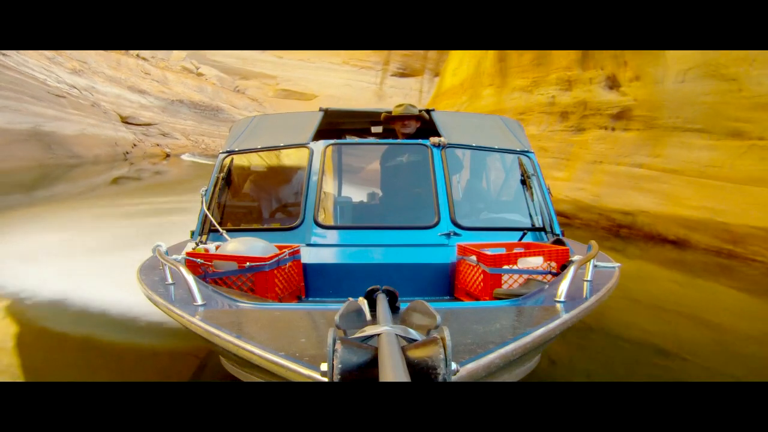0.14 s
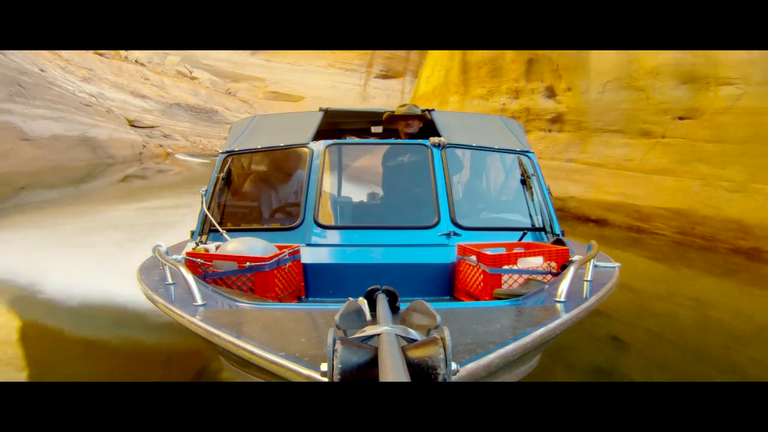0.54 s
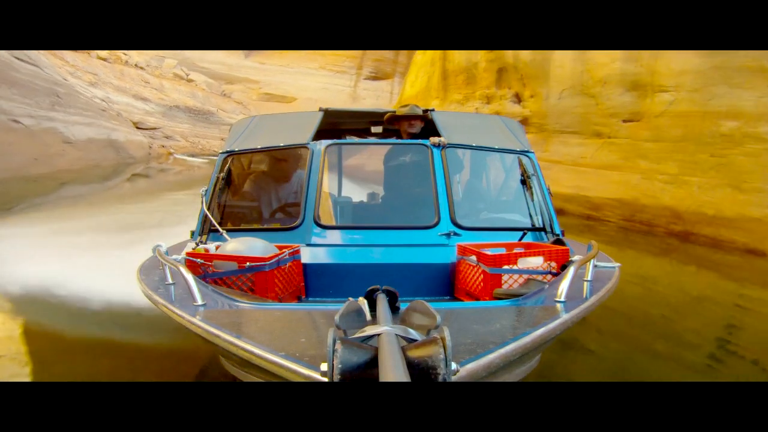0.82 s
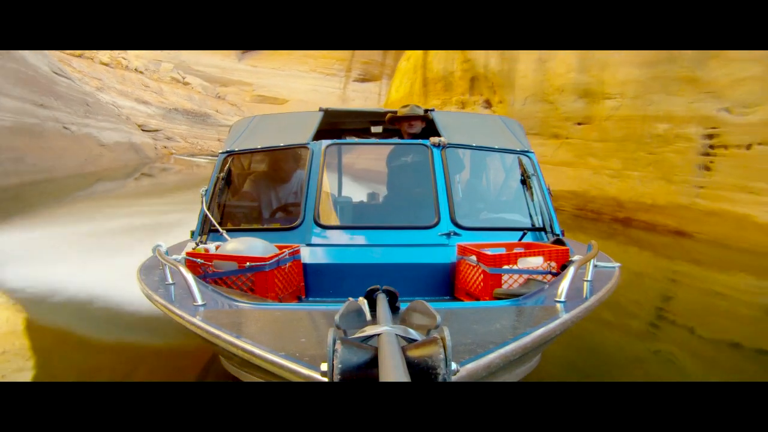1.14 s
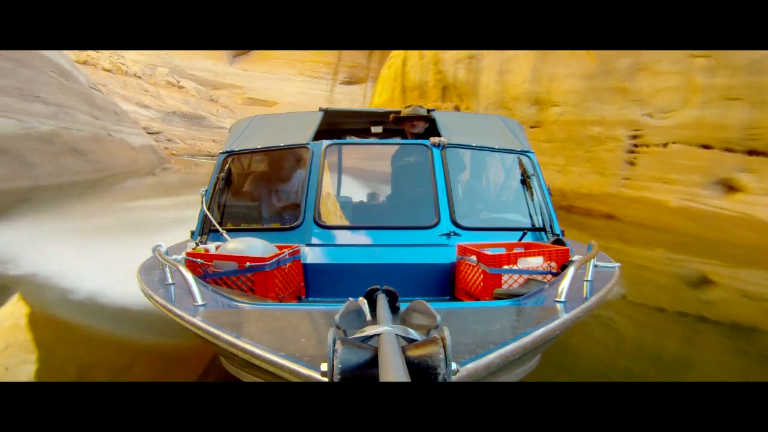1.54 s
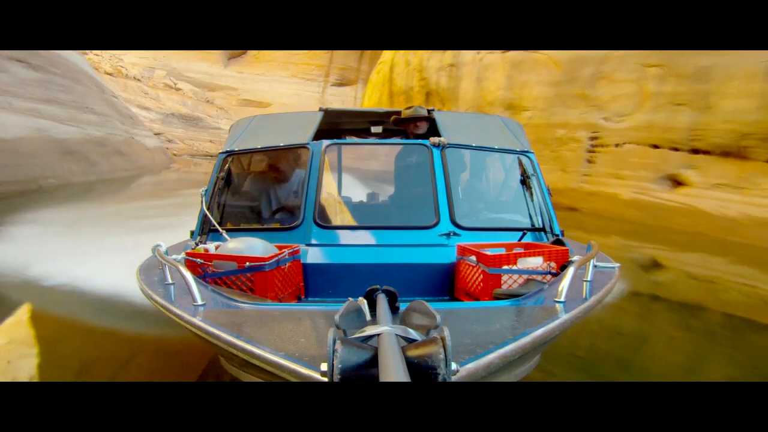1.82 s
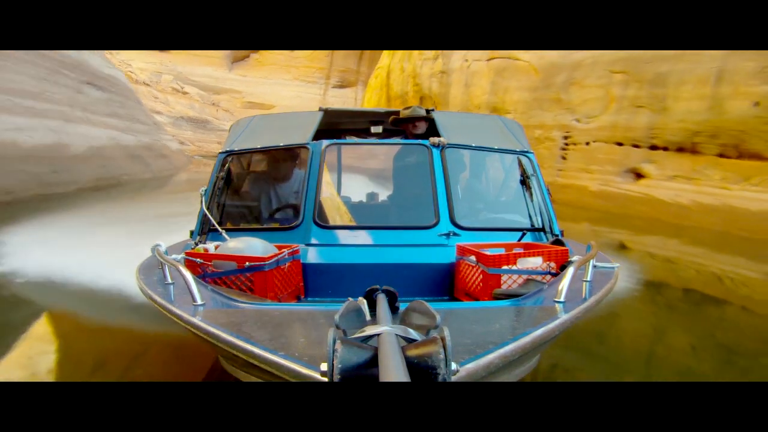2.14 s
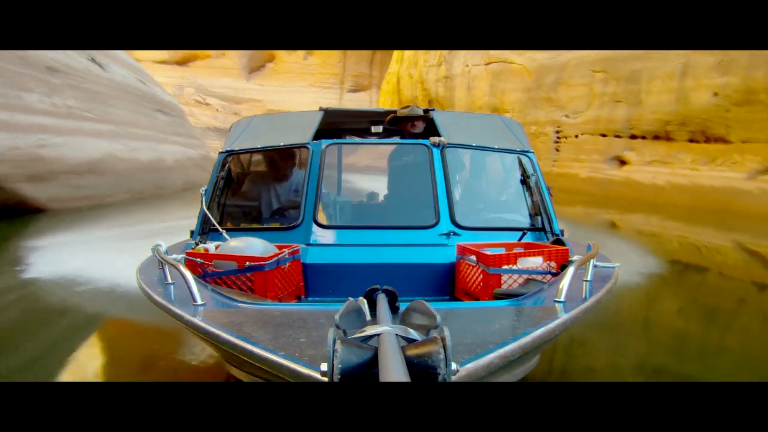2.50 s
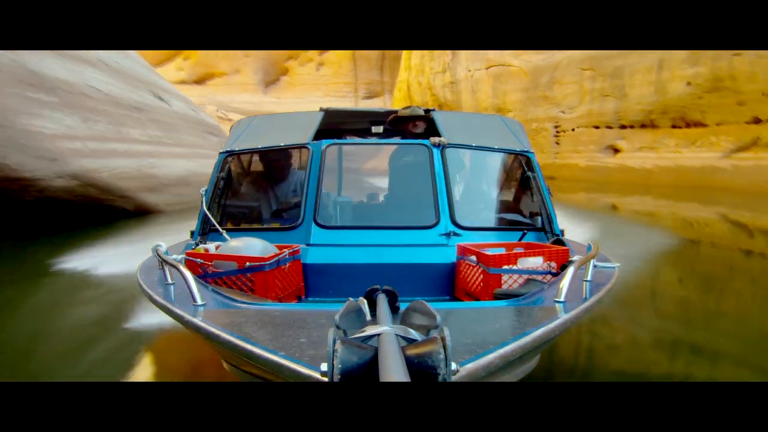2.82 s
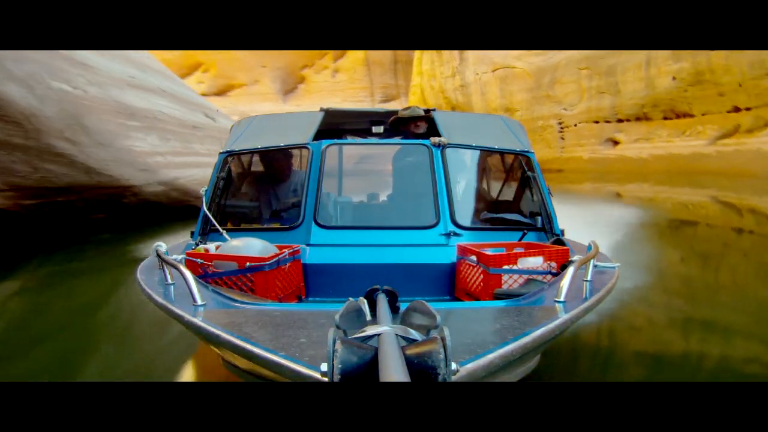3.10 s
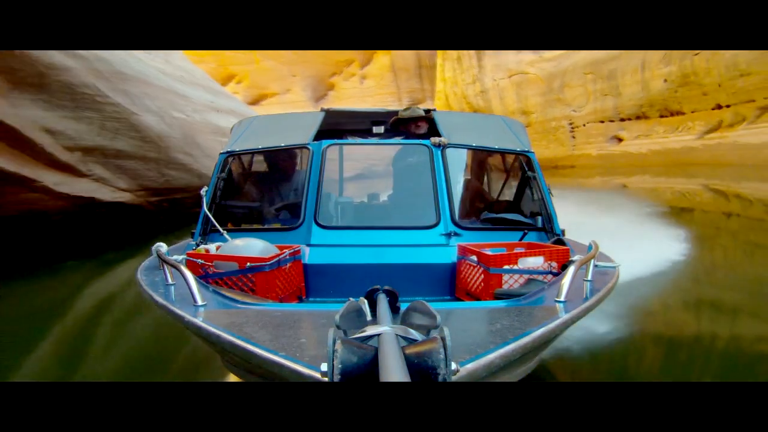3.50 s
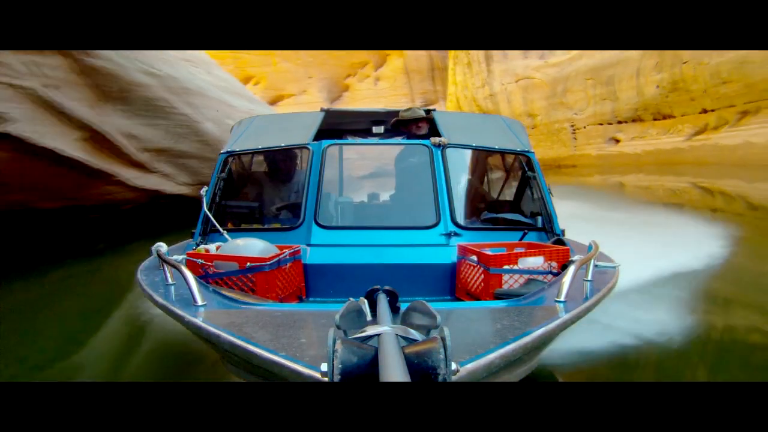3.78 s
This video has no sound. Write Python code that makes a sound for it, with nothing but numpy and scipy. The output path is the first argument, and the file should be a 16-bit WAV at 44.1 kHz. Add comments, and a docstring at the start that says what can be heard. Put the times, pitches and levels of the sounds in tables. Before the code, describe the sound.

Steady low motorboat engine drone with fluttering edges, water roaring against a ringing metal hull.

```python
"""A V8 jet boat runs at full speed, heard from a cased camera on a pole at the bow.
From the start, tones at multiples of the engine cycle drone and waver; firing and blade tones flicker in level.
Filtered noise makes the water roar, ringing in hull and case; low noise buffets, and fine ticks rattle the mount.
Eight slaps surge in the water from 0.28 s to 3.7 s; from 2.3 s rougher water shakes the tones more.
Held 12 kHz samples mirror the bass around 12 kHz throughout."""
import sys
import numpy as np
from scipy import signal
from scipy.fft import rfft, irfft
from scipy.io import wavfile

SR = 44100
rng = np.random.default_rng(int(sys.argv[2]) if len(sys.argv) > 2 else 0)


def master(y):
    """Save y as 16-bit WAV."""
    cut = np.clip(np.atleast_2d(y).T, -1, 1)
    pcm = np.round(cut * 32767)  # scale
    wavfile.write(sys.argv[1], SR, pcm.astype(np.int16))


def makeup_ratio(level_db):
    """Linear amplitude ratio for a level in decibels (20 dB per factor of ten)."""
    decades = np.asarray(level_db, float) / 20
    return 10 ** decades


N = 174195
T = np.arange(N) / SR  # seconds

# Engine speed. Each row: time in seconds, engine cycles in Hz.
CYCLE_CURVE = [(0, 33.15), (.75, 33.2), (1.45, 33.33), (2.2, 33.23), (2.75, 33.06), (3.35, 32.82),
               (3.95, 32.7)]
# Firing tone, eight per cycle. Each row: time in seconds, level in dB rms before wavering.
FIRING_LEVEL = [(0.0, -27.5), (0.19, -16.5), (0.23, -34), (0.26, -16), (0.59, -21), (1.83, -15),
                (1.95, -21.5), (2.07, -12.5), (2.12, -23), (2.16, -16), (2.44, -14), (2.49, -25),
                (2.53, -13.5), (2.69, -14.5), (2.75, -23.5), (2.79, -16.5), (3.04, -18.5), (3.08, -29),
                (3.44, -16.5), (3.63, -18), (3.75, -16), (3.79, -21.5), (3.89, -15.5), (3.95, -40)]
# Impeller blade tone, six per cycle. Each row: time in seconds, level in dB rms before wavering.
BLADE_LEVEL = [(0.0, -18), (0.04, -20), (1.2, -16.5), (1.5, -23), (1.8, -24), (1.95, -17), (2.5, -30.5),
               (2.6, -20.5), (2.94, -30.5), (2.96, -20.5), (3.34, -21.5), (3.39, -23), (3.63, -14.5),
               (3.68, -40), (3.72, -12.5), (3.75, -26), (3.92, -19), (3.95, -22)]
# Shaft tone, two per cycle. Each row: time in seconds, level in dB rms before wavering.
SHAFT_LEVEL = [(0.0, -51), (0.05, -37), (0.73, -35), (2.02, -36), (2.19, -39), (2.51, -33), (3.68, -30.5),
               (3.95, -30)]
# Whine, 22 per cycle. Each row: time in seconds, level in dB rms before wavering.
WHINE_LEVEL = [(0.0, -46), (0.02, -37), (2.34, -43), (2.49, -34.5), (2.77, -41.5), (3.09, -39.5),
               (3.16, -30.5), (3.34, -35), (3.95, -33)]
# Weaker crank orders. Each row: multiple of the cycle, base level in dB rms.
WEAK_ORDERS = [(3, -51), (4, -49.5), (5, -33), (7, -44.5), (9, -32.5), (10, -42.5), (14, -40), (16, -43),
               (24, -48.5), (26, -43), (28, -54), (30, -47.5), (31, -40.5), (34, -48.5), (32, -52.5),
               (35, -44.5), (36, -45.5), (37, -49)]
# Ride of orders 14 and 16 over their base level. Each row: time in seconds, change in dB.
MID_ORDER_RIDE = [(0, -4.5), (2.1, -3.5), (2.5, 2.5), (3.95, 2.5)]
# Rough water as the boat crosses into the turn. Each row: time in seconds, factor on the tones' wavering.
CHOP_CURVE = [(0, 0.81), (2.3, 0.64), (2.8, 1.38), (3.95, 1.48)]
# Water roar above the rumble. Each row: time in seconds, level in dB rms.
ROAR_LEVEL = [(0.0, -37), (0.29, -32.5), (0.38, -36), (0.71, -31), (0.75, -34), (1.97, -33.5), (2.2, -36),
              (2.99, -30), (3.09, -34), (3.21, -29), (3.56, -32.5), (3.59, -27.5), (3.72, -29.5),
              (3.95, -30)]
# Low hull rumble. Each row: time in seconds, level in dB before the lift in roar().
RUMBLE_LEVEL = [(0.0, -28.5), (0.49, -27), (0.67, -26), (1.9, -28.5), (2.22, -31), (2.7, -27),
                (3.35, -21.5), (3.62, -23.5), (3.95, -24.5)]
# Spray hiss. Each row: time in seconds, gain in dB on the case sound.
SPRAY_LEVEL = [(0.03, -53.5), (0.29, -52), (0.6, -51.5), (0.75, -51.5), (1.52, -52.5), (1.72, -51.5),
               (1.76, -53.5), (1.94, -52.5), (2.3, -55.5), (2.34, -53), (3.0, -51), (3.05, -53.5),
               (3.25, -50), (3.51, -51), (3.71, -47), (3.78, -49.5), (3.92, -50)]
# Roar through the hull. Each row: frequency in Hz, relative level in dB per Hz.
HULL_COLOUR = [(12, -62.5), (22, -11.5), (30, -18), (50, -23.5), (85, -30), (120, -34), (176, -19),
               (224, -5.5), (265, -2), (320, -8.5), (384, -10.5), (415, -22.5), (440, -18), (527, -18.5),
               (600, -28), (715, -23), (748, -32), (785, -25), (822, -31), (900, -18.5), (1010, -20),
               (1100, -17), (1190, -21), (1330, -25), (1350, -29), (1500, -35.5), (1600, -43),
               (1750, -60.5), (2200, -93.5)]
# Roar through the camera case, which also colours the rattle. Each row: frequency in Hz, relative dB per Hz.
CASE_COLOUR = [(1000, -33), (1700, -6.5), (1810, -3), (1920, -3.5), (1960, -5), (2170, -6), (2500, 0),
               (2870, -10.5), (3540, -6), (3950, -11), (4540, -8), (5260, -9.5), (6000, -18.5), (7800, -52),
               (13200, -120)]
# Hull panels rung by the water. Each row: frequency in Hz, width in Hz, relative level in dB.
PANEL_RINGS = [(275.6, 14, 3), (307, 13, -13), (380.3, 35.3, -1), (712, 182, -9.5), (782, 43, -19.5),
               (991, 58, -11.5), (1044, 40, -10), (1136, 29, -15), (1198, 106, -12)]
# Camera case resonances. Each row: frequency in Hz, width in Hz, relative level in dB.
CASE_RESONANCES = [(1851, 27, -11.5), (2990, 53, -22.5), (3600, 160, -19.5), (2460, 110, -13.5),
                   (2565, 37, -17.5), (2660, 42, -20)]
# Swell of the spray below the treble, where the case rings. Each row: time in seconds, change in dB.
CASE_SWELL_RIDE = [(0, -1), (2.2, -1), (2.4, 0), (3.2, 2), (3.95, 3)]
# Waves slapping the hull, each a short surge of water noise. Each row: peak time in seconds, surge in dB.
SLAP_SURGES = [(.283, 4), (0.707, 5.5), (1.1, 4.5), (1.578, 5.5), (2.0, 5.5), (3.014, 4.5), (3.382, 5),
               (3.7, 3.5)]
# Low buffeting of wind and slaps. Each row: time in seconds, level in dB rms before wavering.
BUFFET_LEVEL = [(0.0, -62), (0.03, -50), (0.29, -54.5), (2.53, -43.5), (2.83, -47), (3.88, -31),
                (3.95, -40)]

WEAK_WOBBLE_DB = 3
BLUR_SLIP, WEAK_SLIP = 0.8, 0.3  # phase wander in radians, before the chop
TURN_GATE, CYCLE_GATE = 0.067, 0.099  # depth of the roar's throb per shaft turn and per cycle
SPLIT_HZ, TREBLE_HZ = 640, 3950  # top of the rumble, top of the case swell
SLAP_RISE_S, SLAP_FALL_S = 0.012, 0.0054  # time constants
BUFFET_HZ = 155  # upper edge
RATTLE_PER_S, RATTLE_DB = 700, -56  # ticks where the shake is at its rms, level in dB rms
RATTLE_SPREAD_DB = 1.5
LIMIT_DB, RECOVER_DB_PER_S = -8, 23  # gain control threshold, fall of its peak hold
SQUEEZE, ATTACK_S = 0.55, 0.004  # dB of cut per dB over, smoothing time constant


def evened(x):
    """Scale to rms 1."""
    return x / np.sqrt(np.mean(x ** 2) + 1e-20)


def curve(points):
    """Draw a (seconds, value) table as straight lines over every sample."""
    return np.interp(T, *np.transpose(points))


def wander(hz):
    """Slow random drift of rms 1, fading out around hz."""
    f = np.fft.rfftfreq(N, 1 / SR)
    shape = np.exp(-(f / hz) ** 2) * (f > 0)
    return evened(irfft(rfft(rng.standard_normal(N)) * shape, N))


def colour(x, points):
    """Filter by a (Hz, dB) spectrum, then scale to rms 1."""
    f, db = np.transpose(points)
    hz = np.fft.rfftfreq(N, 1 / SR)
    response = makeup_ratio(np.interp(np.log(hz + 1), np.log(f + 1), db))
    return evened(irfft(rfft(x) * response, N))


def resonate(x, hz, width):
    """A fixed steep resonance (two poles applied twice), rms 1."""
    r = np.exp(-np.pi * width / SR)
    poles = [1, -2 * r * np.cos(2 * np.pi * hz / SR), r * r]
    once = signal.lfilter([1, 0, -1], poles, x)
    return evened(signal.lfilter([1, 0, -1], poles, once))


def below(x, hz):
    """The part of x under hz."""
    return irfft(rfft(x) * (np.fft.rfftfreq(N, 1 / SR) < hz), N)


def tone(turns, order, db, wobble_db, wobble_hz=13, slip=0.53, sway=None):
    """One crank order, wavering in level and phase, more in rough water; sway is a phase wander it may share."""
    chop = curve(CHOP_CURVE)
    sway = wander(wobble_hz) if sway is None else sway
    phase = 2 * np.pi * (order * turns + rng.random()) + slip * chop * sway
    level_db = db + wobble_db * chop * np.tanh(wander(wobble_hz))
    return np.sqrt(2) * makeup_ratio(level_db) * np.sin(phase)


def engine(turns):
    """Firing and blade tones sway together; shaft, whine, two blurred middle orders and the weaker ones."""
    sway = wander(31.5)
    out = tone(turns, order=8, db=curve(FIRING_LEVEL), wobble_db=2.0, wobble_hz=20.9, slip=0.14, sway=sway)
    out += tone(turns, order=6, db=curve(BLADE_LEVEL), wobble_db=1.23, wobble_hz=11, slip=0.18, sway=sway)
    out += tone(turns, order=2, db=curve(SHAFT_LEVEL), wobble_db=1.7, wobble_hz=7.6, slip=0.32)
    out += tone(turns, order=22, db=curve(WHINE_LEVEL), wobble_db=1.0, wobble_hz=18, slip=0.092)
    roar_db = curve(ROAR_LEVEL)
    roar_ride = roar_db - roar_db.mean()
    for order, db in WEAK_ORDERS:
        slip = WEAK_SLIP
        if order in (14, 16):
            db = db + curve(MID_ORDER_RIDE)
            slip = BLUR_SLIP
        elif order >= 30:  # these sound through the hull panels and follow the roar
            db = db + roar_ride
        out += tone(turns, order, db, WEAK_WOBBLE_DB, slip=slip)
    return out


def slaps():
    """Gain of the water noise: swells up to each slap, then drops faster."""
    surge_db = np.zeros(N)
    for peak_s, db in SLAP_SURGES:
        time_constant = np.where(T < peak_s, SLAP_RISE_S, SLAP_FALL_S)
        surge_db += db * np.exp(-np.abs(T - peak_s) / time_constant)
    return makeup_ratio(surge_db)


def roar(turns):
    """Water rush and spray, throbbing with the shaft, through hull panels and case."""
    throb = 1 + TURN_GATE * np.cos(4 * np.pi * turns) + CYCLE_GATE * np.cos(2 * np.pi * turns + 0.88)
    drift = makeup_ratio([0.59 * wander(37), 0.68 * wander(33)])
    rush, spray = rng.standard_normal((2, N)) * slaps() * throb * drift

    hull = makeup_ratio(10.5) * colour(rush, HULL_COLOUR)
    hull += sum(makeup_ratio(db) * resonate(rush, hz, width) for hz, width, db in PANEL_RINGS)
    low = below(hull, SPLIT_HZ)

    case = colour(spray, CASE_COLOUR)
    case += sum(makeup_ratio(db) * resonate(spray, hz, width) for hz, width, db in CASE_RESONANCES)
    case += (makeup_ratio(curve(CASE_SWELL_RIDE)) - 1) * below(case, TREBLE_HZ)

    out = makeup_ratio(curve(RUMBLE_LEVEL) + 3.5) * evened(low)
    out += makeup_ratio(curve(ROAR_LEVEL)) * evened(hull - low)
    return out + makeup_ratio(curve(SPRAY_LEVEL)) * case


def buffet():
    """Lumpy low wind and hull slaps: band-limited noise that wavers in level."""
    band = signal.butter(2, [22, BUFFET_HZ], "band", fs=SR, output="sos")
    low = signal.sosfilt(band, rng.standard_normal(N))
    return makeup_ratio(curve(BUFFET_LEVEL) + 1.1 * wander(8.9)) * evened(low)


def rattle(shake):
    """The mount chatters finely in its play, mostly when the pole swings far one way."""
    odds = RATTLE_PER_S / SR * np.clip(evened(shake), 0.4, 2.2) ** 2
    size = np.minimum(rng.exponential(1, N), 2)
    ticks = (rng.random(N) < odds) * makeup_ratio(RATTLE_SPREAD_DB * size)
    decay = np.exp(-1 / (0.001 * SR))  # each tick dies away over 1 ms
    chatter = np.tanh(signal.lfilter([1], [1, -decay], ticks) / 2)
    return makeup_ratio(RATTLE_DB) * colour(rng.standard_normal(N) * chatter, CASE_COLOUR)


def scene():
    """Engine, water, wind and mount add up at the camera."""
    turns = np.cumsum(curve(CYCLE_CURVE)) / SR  # engine cycles so far
    shake = engine(turns) + roar(turns) + buffet()
    return (shake + rattle(shake))[None]


def band_limit(x):
    """A steep low-pass at the top of the band."""
    return signal.sosfilt(signal.butter(12, 15230, fs=SR, output="sos"), x)


def record(dry):
    """Gain control that drops just after big peaks, then 12 kHz sampling held for four steps of 48 kHz."""
    peak_db = 20 * np.log10(abs(dry[0]) + 1e-9)
    fall = T * RECOVER_DB_PER_S
    held_peak_db = np.maximum.accumulate(peak_db + fall) - fall
    over_db = np.maximum(held_peak_db - LIMIT_DB, 0)
    r = np.exp(-1 / (ATTACK_S * SR))
    cut_db = SQUEEZE * signal.lfilter([1 - r], [1, -r], over_db)
    ducked = dry[0] / makeup_ratio(cut_db)
    held = np.repeat(signal.resample_poly(ducked, 40, 147), 4)  # the steps mirror the bass around 12 kHz
    mix = signal.resample_poly(np.pad(held, (0, 64)), 147, 160)[:N]  # 48 kHz back to SR
    return band_limit(mix[None])


dry = scene()
out = record(dry)
master(out)
```